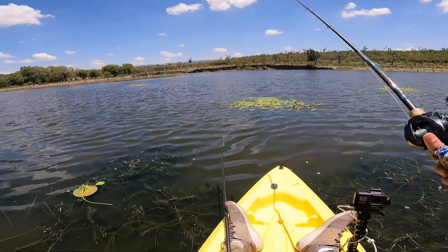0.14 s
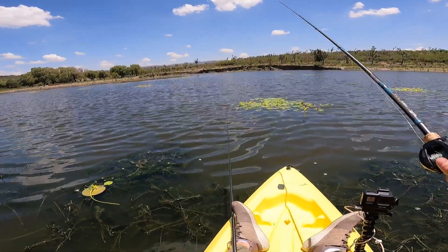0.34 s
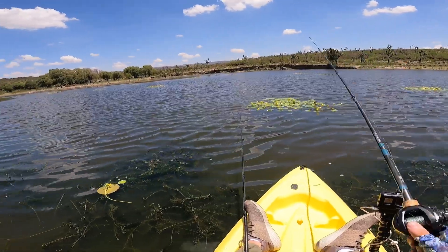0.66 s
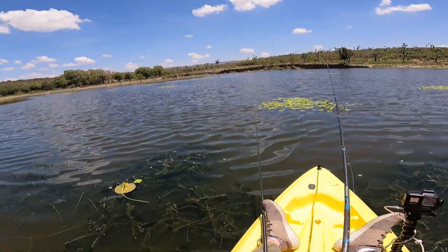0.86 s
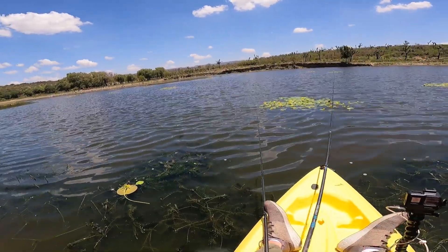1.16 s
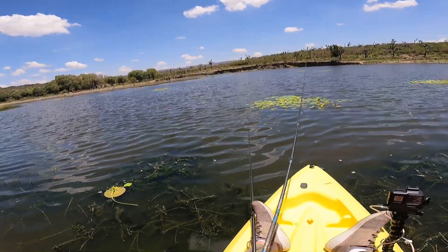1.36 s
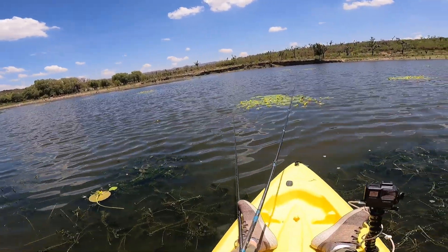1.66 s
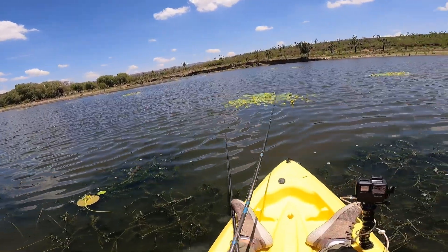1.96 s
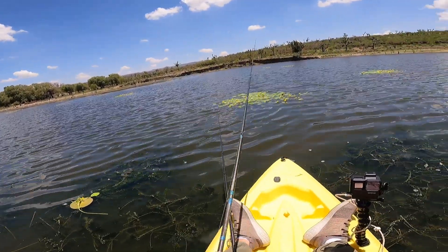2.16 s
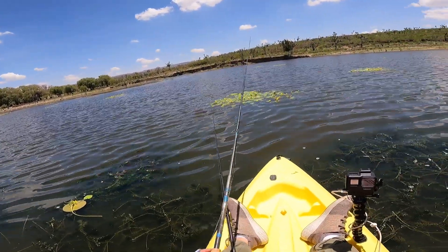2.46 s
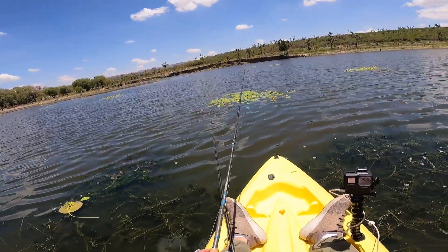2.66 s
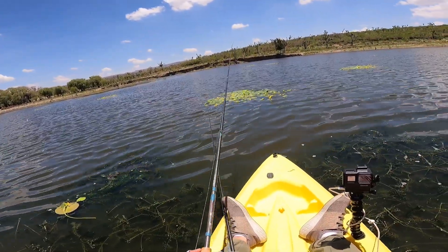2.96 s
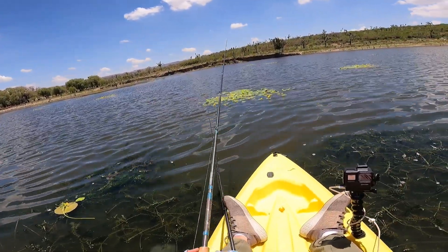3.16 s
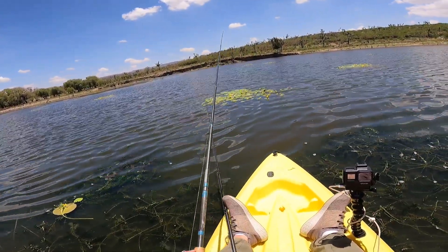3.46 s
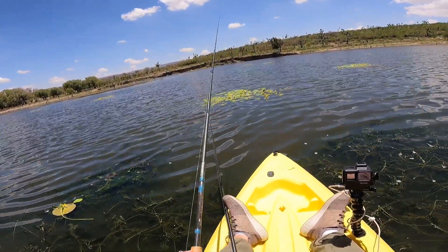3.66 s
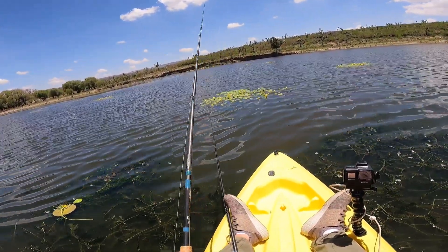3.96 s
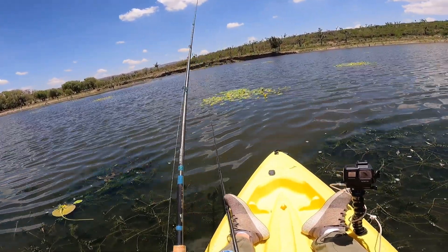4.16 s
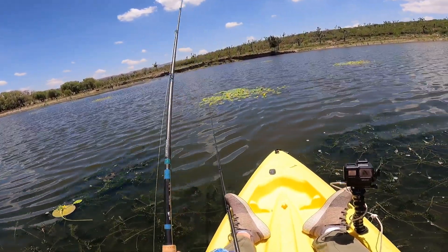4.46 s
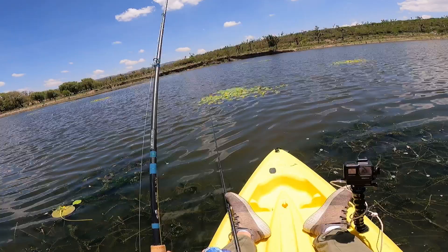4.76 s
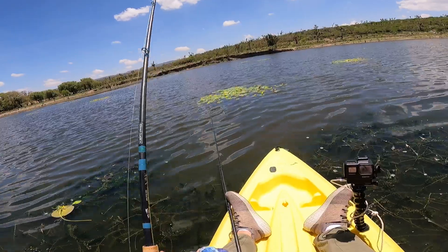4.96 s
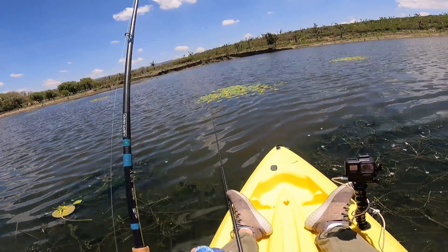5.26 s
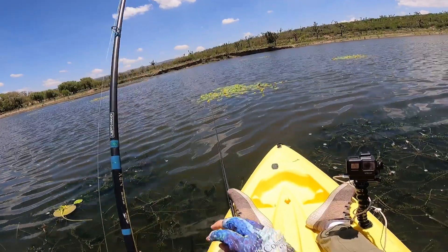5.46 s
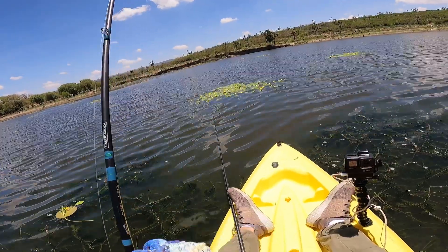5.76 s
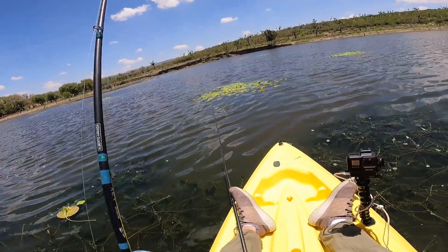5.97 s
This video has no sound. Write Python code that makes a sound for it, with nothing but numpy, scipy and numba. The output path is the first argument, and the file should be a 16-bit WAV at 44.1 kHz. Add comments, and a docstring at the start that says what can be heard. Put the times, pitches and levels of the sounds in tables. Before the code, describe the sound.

Quiet lake, outdoors and dry. Line whirrs softly, a lure plips and bloops into water, and cloth rubs nearby. Two bright, hard reel clacks burst out about 1.2 seconds apart, far louder than everything else, the first distorting and briefly pushing the background down. Low wind buffeting and ripples continue while small birds chirp from the bank.

```python
"""A cast from a kayak

On a quiet lake a spool whirrs (shaped noise) and a lure plops in (water slaps, ringing bubbles and cavity).
The reel clicks twice (struck modes and cracks), overloading and ducking a body-worn microphone.
Light wind rumbles, ripples lap the hull and sleeves rustle (noise with moving levels).
Small birds call from the shore (gliding sines, blurred by an echo)."""
import sys
import numpy as np
from scipy import signal
from scipy.fft import rfft, irfft
from scipy.io import wavfile
from scipy.ndimage import uniform_filter1d
from numba import njit

SR = 44100
rng = np.random.default_rng(int(sys.argv[2]) if len(sys.argv) > 2 else 0)


def master(y):
    """Save y as 16-bit WAV."""
    cut = np.clip(np.atleast_2d(y).T, -1, 1)
    pcm = np.round(cut * 32767)  # scale
    wavfile.write(sys.argv[1], SR, pcm.astype(np.int16))


N = 269671
T = np.arange(N) / SR
RING = T[:SR // 3]  # time since a blow, in seconds

# Contacts inside the reel. Each row: start in seconds, steel level in dB, frame level in dB,
# housing thump level in dB, pitch the steel rings most at in Hz.
REEL_CONTACTS = [(1.4495, -39, -49.5, -60, 6700), (1.4543, -38, -51, -59, 6050),
                 (1.4603, -19.5, -28, -31.5, 7400), (1.4669, -36, -32.5, -50, 6500),
                 (1.4808, -9.5, -25, -28, 6500), (1.483, 6, -.5, -3.5, 6770), (1.4838, 2.5, -15, -19, 7700),
                 (1.4985, -33, -42, -48.5, 6960), (1.5165, -37.5, -41, -48, 6020),
                 (2.666, -37.5, -43, -49, 6500), (2.6905, -33, -42, -45, 6000),
                 (2.7106, -8, -18, -6.5, 5700), (2.7135, -4, -21, -33, 7990), (2.7328, -45, -52, -31, 7000),
                 (2.8106, -49, -49, -42, 6000), (3.283, -50, -43.5, -45, 5000)]
# Modes of the frame, the steel catch and the hollow housing.
# Each row: frequency in Hz, relative level in dB, time to decay by 60 dB in seconds.
FRAME_MODES = [(459, -19.5, 0.031), (1812, -5, .011), (2053, -2, .014), (2215, -21, 0.05),
               (2415, -22.5, .05), (2590, -20.5, 0.086), (2725, -17, .04), (2865, -16, .05),
               (3080, -15.5, .018), (3900, -16, .016)]
STEEL_MODES = [(4400, -14, 0.021), (5320, -5.5, 0.011), (5800, -7.5, .01), (6620, -5, 0.0089),
               (7400, -4.5, 0.0086), (7750, -6, .009), (8040, -3, .01), (8640, -8, 0.0064),
               (9340, -8.5, .01), (10880, -13.5, .008), (12580, -4, .007), (13500, -10, .007),
               (6180, -35, .05), (7080, -29, 0.023)]
HOUSING_MODES = [(780, -2.5, .02), (700, -30.5, 0.1), (840, -25.5, .055), (950, -8, 0.024),
                 (1090, -8.5, .014)]
# Noise of the crack, and of the sound thrown back by the hull.
# Each row: frequency in Hz, relative density in dB per Hz.
CRACK_SPECTRUM = [(100, -15.5), (400, -16.5), (1500, -5.5), (3000, -5.5), (4500, -3.5), (7000, -6),
                  (9000, -4.5), (11000, -8), (15000, -7.5)]
SCATTER_SPECTRUM = [(120, -9.5), (350, -9), (600, 0), (850, 10.5), (1400, -8), (2100, -1.5), (2750, 7),
                    (3300, -7), (7000, -6.5), (9500, -12.5), (12000, -22)]
SOFT_EDGE_HZ, HARD_EDGE_HZ = 8600, 4200  # top edge of a light contact; its rise per unit of blow energy


def reel():
    """Modal impact: contacts milliseconds apart ring steel, frame and housing, and the hull scatters the sound."""
    out = np.zeros(N)
    for at, steel_db, frame_db, thump_db, steel_hz in REEL_CONTACTS:
        blow = undb(steel_db)
        steel = ring(favour(STEEL_MODES, steel_hz), rise_s=.0002)
        crack = undb(-13) * fade(.017) * noise(CRACK_SPECTRUM, len(RING))
        scatter = undb(-29) * fade(.07) * noise(SCATTER_SPECTRUM, len(RING))
        # softer contacts are duller
        snap = band(steel + crack + scatter, 90, SOFT_EDGE_HZ + HARD_EDGE_HZ * blow ** 2)
        frame = ring(FRAME_MODES, rise_s=.0002)
        # the housing thump is kept out of the bass
        thump = band(ring(HOUSING_MODES, rise_s=.00026), 590, 6000)
        add(out, at, blow * snap + undb(frame_db) * frame + undb(thump_db) * thump)
    return out


def favour(modes, centre_hz, focus_octaves=.22, off_centre=.3):
    """Modal excitation: the place of contact favours the modes near one pitch."""
    favoured = []
    for hz, db, t60 in modes:
        distance = np.log2(hz / centre_hz) / focus_octaves
        gain = off_centre + np.exp(-distance ** 2)
        favoured.append((hz, db + 20 * np.log10(gain), t60))
    return favoured


def ring(modes, rise_s):
    """Modal superposition: decaying sines, alternating in sign, build up over the contact time."""
    total = np.zeros(len(RING))
    for k, (hz, db, t60) in enumerate(modes):
        total += (-1) ** k * undb(db) * fade(t60) * np.sin(2 * np.pi * hz * RING)
    return total * (1 - np.exp(-RING / rise_s))


# Slaps of water, from the lure and against the hull.
# Each row: start in seconds, level in dB, pitch in Hz, time to decay by 60 dB in seconds.
WATER_SLAPS = [(0.175, -38, 1500, 0.029), (.195, -52, 770, 0.18), (0.579, -48, 373, 0.089),
               (0.634, -39, 2360, 0.035), (.668, -47.5, 2200, 0.11), (0.6877, -35.5, 1510, 0.045),
               (0.7024, -31, 4200, 0.018), (0.7197, -31.5, 2570, 0.014), (0.7755, -50, 6540, 0.012),
               (.849, -41.5, 1580, 0.029), (1.159, -46, 4000, 0.013), (1.812, -51, 330, 0.13),
               (2.069, -45, 199, .14), (2.585, -50.5, 403, 0.091)]
# Single bubbles. Each row: start in seconds, level in dB, starting pitch in Hz,
# time to decay by 60 dB in seconds, rise in octaves per second.
SINGLE_BUBBLES = [(.205, -44.5, 377, .08, 8.5), (.578, -47, 330, 0.1, 16), (.689, -41, 457, 0.12, -4),
                  (0.689, -32.5, 1244, 0.036, 8), (0.722, -33.5, 327, 0.16, 4),
                  (1.195, -45, 151.1, 0.22, 13.5), (1.814, -49.5, 430, .12, -5),
                  (2.069, -40, 330, .13, -11.5), (2.93, -42, 197.7, .13, -1.5)]


def water():
    """Impact and bubble resonance: the lure slaps, sprays and closes a cavity; wavelets slap the hull."""
    out = spray()
    for at, *shape in WATER_SLAPS:
        add(out, at, splash(*shape))
    for at, *shape in SINGLE_BUBBLES:
        add(out, at, bubble(*shape))
    add(out, .749, bloop())
    return out


def spray(start_s=.618, length_s=.112, count=16, db=-47.5, centre_hz=5800, spread_octaves=1.2):
    """Random superposition: fine drops thrown up as the lure skims in land one per time slot."""
    out = np.zeros(N)
    for k, (late, pitch) in enumerate(rng.random((count, 2))):
        hz = centre_hz * 2 ** (spread_octaves * (pitch - .5))
        add(out, start_s + length_s * (k + late) / count, splash(db, hz, t60=.033))
    return out


def splash(db, hz, t60, droplets_db=3):
    """Impact noise: a slap of water, peaked at one pitch, is broken up by separate droplets."""
    colour = [(hz / 4, -11), (hz / 1.9, -5), (hz, 0), (hz * 1.18, -8), (hz * 3, -17)]
    drops = noise(colour, len(RING)) * undb(droplets_db * walk(600, len(RING)))
    drops = band(drops, 97, min(hz * 4, 10000))
    return undb(db) * drops * fade(t60) * (1 - np.exp(-RING / .00081))


def bubble(db, hz, t60, rise):
    """Bubble resonance: a ringing air pocket whose pitch slides as it moves."""
    sine = np.sin(2 * np.pi * np.cumsum(hz * 2 ** (rise * RING)) / SR)
    return undb(db) * fade(t60) * (1 - np.exp(-RING / .00074)) * sine


def bloop(db=-31.5, start_hz=424, octaves_per_s=31, hold_s=.04, t60=.037):
    """Cavity resonance: the air behind the lure rings ever higher as it shrinks, then dies away."""
    t = RING[RING < hold_s + t60]
    decay = np.exp(-np.log(1000) * np.maximum(t - hold_s, 0) / t60)
    envelope = (1 - np.exp(-t / .0013)) * decay
    return undb(db) * envelope * tone(start_hz * 2 ** (octaves_per_s * t), waver=.014)


# Whirr of the spool. Each row: time in seconds, relative level in dB.
SPOOL_LEVEL = [(0, -60.5), (.2, -64.5), (.35, -63), (.5, -69), (.62, -72), (.9, -69)]
# Each row: frequency in Hz, relative density in dB per Hz.
SPOOL_SPECTRUM = [(300, 4), (700, 9), (1200, -2), (1450, 7.5), (1560, 6), (1700, 6), (2000, -2),
                  (2600, -31), (5000, -11), (9000, -31)]


def spool():
    """Spectral shaping: line whirrs off the spool as unsteady noise with raised bands."""
    return undb(-1 + 1.7 * walk(44)) * swell(SPOOL_LEVEL) * noise(SPOOL_SPECTRUM)


# Sleeve rubs: a long soft rustle, with shorter rubs over and after it.
# Each row: start in seconds, length in seconds, relative level in dB.
SLEEVE_RUBS = [(0, 1.61, -67.5), (0, 0.079, -66), (0.304, 0.083, -80.5), (0.433, 0.093, -78.5),
               (1.168, 0.14, -63), (1.36, 0.14, -63.5), (1.66, 0.11, -69.5), (1.801, 0.013, -69),
               (1.93, .13, -76.5), (2.53, 0.061, -65), (2.658, 0.059, -61), (2.77, 0.055, -67),
               (2.88, 0.48, -72), (3.38, .2, -73.5), (5.48, 0.5, -65.5)]
# Each row: frequency in Hz, relative density in dB per Hz.
CLOTH_SPECTRUM = [(500, 5.5), (1500, 2), (3000, 2), (4500, -2.5), (6500, 3), (8200, -1.5), (10000, -9.5),
                  (14000, -28.5)]


def sleeves(grain_db=2, pressure_db=.82):
    """Friction noise: sleeves rub in small catches under a changing pressure as the rod is moved."""
    rubs = np.zeros(N)
    for at, length_s, db in SLEEVE_RUBS:
        add(rubs, at, undb(db) * arch(length_s, roundness=.6)[1])
    catches = undb(4 + grain_db * walk(150) + pressure_db * walk(25))
    return catches * rubs * noise(CLOTH_SPECTRUM)


def birds(flutter_db=2.0, echo_db=-6, echo_t60=.35):
    """Amplitude modulation and diffuse reflection: fluttering calls from the bank, blurred by the bushes."""
    calls = hooked_calls() + whistles() + chirps() + twitter()
    calls *= undb(flutter_db * walk(90))
    bushes = rng.standard_normal(len(RING)) * fade(echo_t60)
    echo = signal.fftconvolve(calls, bushes / np.linalg.norm(bushes))[:N]
    return calls + undb(echo_db) * echo


# Hooked calls. Each row: start in seconds, length in seconds, peak pitch in Hz,
# held pitch in Hz, relative level in dB.
HOOKED_CALLS = [(3.508, .21, 5500, 4130, -67), (4.875, .16, 5250, 4380, -63),
                (5.883, .165, 5280, 4004, -55)]


def hooked_calls():
    """Frequency modulation: each call flicks up to a high peak and drops to a sagging note."""
    out = np.zeros(N)
    for at, *shape in HOOKED_CALLS:
        add(out, at, hook(*shape))
    return out


def hook(length_s, peak_hz, held_hz, db, sag=.72, fade_db=3.5, accent_db=7):
    """Frequency modulation: a bell-shaped flick rides on a bent note, with stress on the peak."""
    u, envelope = arch(length_s, roundness=.6)
    held = held_hz * (1 - sag * (u - .6) ** 2)
    flick = np.exp(-((u - .15) / .115) ** 2)  # place and width as shares of the call's length
    level = undb(db + fade_db * (.5 - u) + accent_db * flick)
    return level * envelope * tone(held + (peak_hz - held) * flick, waver=.0095)


# Plain slurred whistles. Each row: start in seconds, length in seconds, first pitch in Hz,
# last pitch in Hz, relative level in dB.
SLURRED_WHISTLES = [(2.81, .12, 4450, 3700, -69.5), (3.06, .09, 5250, 5750, -69),
                    (3.185, .06, 6000, 6480, -69), (3.913, .07, 3500, 3900, -67.5),
                    (4.03, .05, 3450, 3850, -73), (4.43, .022, 5600, 6800, -63.5),
                    (4.735, .1, 5050, 4350, -72)]


def whistles():
    """Linear glide: plain whistles slur up or down."""
    out = np.zeros(N)
    for at, *shape in SLURRED_WHISTLES:
        add(out, at, slur(*shape))
    return out


# Upward chirps. Each row: start in seconds, relative level of the lower voice in dB.
UPWARD_CHIRPS = [(3.24, -60.5), (4.795, -67), (5.294, -57)]


def chirps(length_s=.033, from_hz=2400, to_hz=4250, upper_ratio=1.38, upper_db=-12):
    """Two-voice superposition: quick upward glides sound together at a fixed pitch ratio."""
    out = np.zeros(N)
    for at, db in UPWARD_CHIRPS:
        add(out, at, slur(length_s, from_hz, to_hz, db))
        add(out, at, slur(length_s, upper_ratio * from_hz, upper_ratio * to_hz, db + upper_db))
    return out


def twitter(start_s=4.667, interval_s=.027, count=7, centre_hz=6500, fall=.1):
    """Pulse train: a run of quick falling chips, overlapping slightly."""
    out = np.zeros(N)
    for k in range(count):
        hz = centre_hz * (1 + .04 * rng.standard_normal())
        chip = slur(.032, hz * (1 + fall), hz * (1 - fall), db=-68, waver=.06)
        add(out, start_s + k * interval_s, chip)
    return out


def slur(length_s, from_hz, to_hz, db, waver=.0087):
    """Linear glide: a bird's note slides from one pitch to another."""
    u, envelope = arch(length_s, roundness=.6)
    return undb(db) * envelope * tone(from_hz + (to_hz - from_hz) * u, waver)


# Strength of the ripples. Each row: time in seconds, level of the wash in dB.
RIPPLE_LEVEL = [(0, -60.5), (.95, -55), (1.1, -48.5), (1.5, -53), (2.1, -55), (2.9, -53), (3.76, -54.5),
                (4.0, -56), (4.9, -59), (5.55, -55.5), (6.11, -59)]
# Each row: frequency in Hz, relative density in dB per Hz.
RIPPLE_SPECTRUM = [(40, -2.5), (80, 2.5), (150, 0), (240, -8), (400, -19.5), (900, -36)]


def hull(gulp_db=1, gulp_hz=190):
    """Flow noise and bubble resonance: ripples wash along the kayak and trap small, low air pockets."""
    gulps = np.zeros(N)
    for at, pitch, size, rise in rng.random((60, 4)):
        hz = gulp_hz * 2 ** (1.6 * (pitch - .5))
        gulp = bubble(gulp_db + 9 * size, hz, t60=.053, rise=8 * (rise - .5))
        add(gulps, at * T[-1], gulp)
    return swell(RIPPLE_LEVEL) * (noise(RIPPLE_SPECTRUM) + gulps)


# Strength of the wind at the microphone. Each row: time in seconds, relative level in dB.
WIND_LEVEL = [(0.0, -44), (0.63, -38), (0.75, -45), (1.33, -34.5), (1.36, -45.5), (2.64, -37.5),
              (2.77, -28), (2.98, -44), (3.01, -37.5), (3.62, -41.5), (3.9, -39.5), (5.12, -45),
              (5.21, -35.5), (5.29, -45.5), (5.34, -28.5), (5.43, -38), (5.99, -34.5), (6.11, -47)]
# Wind rumble and the rush of the open lake. Each row: frequency in Hz, relative density in dB per Hz.
WIND_SPECTRUM = [(8, -1.5), (18, 0), (30, -5), (50, -14.5), (80, -22), (150, -36.5), (400, -58)]
AIR_SPECTRUM = [(150, -30), (250, -1.5), (339, -6.5), (370, -3.5), (402, -2.5), (575, -4), (794, -0.5),
                (1280, -14), (3200, -18), (4060, -19), (4410, -18), (4890, -19.5), (5230, -19),
                (7730, -21.5), (14500, -26)]


def breeze():
    """Turbulent pressure: eddies buffet the microphone over the soft, even rush of the open lake."""
    eddies = noise(WIND_SPECTRUM)
    eddies /= np.sqrt(uniform_filter1d(eddies ** 2, size=6000))  # the gusts alone set their strength
    rumble = undb(4.5) * swell(WIND_LEVEL) * eddies
    air = undb(-61.5 + .35 * walk(6.8)) * noise(AIR_SPECTRUM)
    return rumble + air


def undb(db):
    """Logarithmic level: decibels to gain."""
    return 10 ** (np.asarray(db) / 20)


def fade(t60):
    """Exponential damping: free decay by 60 dB in t60 seconds."""
    return np.exp(-np.log(1000) * RING / t60)


def add(out, at, sound):
    """Superposition: mix a sound in at a time in seconds."""
    i = int(round(at * SR))
    out[i:i + len(sound)] += sound[:N - i]


def swell(rows):
    """Level envelope: smoothed gain from (seconds, dB) rows, silent outside them."""
    s, db = np.transpose(rows)
    inside = (T >= s[0]) * (T <= s[-1])
    return uniform_filter1d(undb(np.interp(T, s, db)) * inside, size=200)


def noise(colour, length=N):
    """Spectral shaping: noise of rms 1 with a (Hz, dB) spectrum that falls away beyond its ends."""
    hz, db = np.transpose(colour)
    f = np.fft.rfftfreq(length, 1 / SR) + 1e-3
    gain = undb(np.interp(np.log(f), np.log(hz), db))
    gain *= np.minimum(f / hz[0], 1) ** 2 * np.minimum(hz[-1] / f, 1) ** 2
    x = irfft(rfft(rng.standard_normal(length)) * gain, length)
    return x / x.std()


def walk(rate, length=N):
    """Random modulation: slow chance with a spread of 1, drawn rate times a second."""
    k = int(SR / rate)
    steps = np.repeat(rng.standard_normal(length // k + 1), k)
    x = uniform_filter1d(steps, k)[:length]
    return x / x.std()


def band(x, low_hz, top_hz):
    """Band-pass filtering: keep what lies between two edges."""
    edges = [low_hz, min(top_hz, .45 * SR)]
    return signal.sosfilt(signal.butter(3, edges, "band", fs=SR, output="sos"), x)


def arch(length_s, roundness):
    """Amplitude envelope: progress from 0 to 1, and a swell and decay, more gradual if roundness is large."""
    u = np.linspace(0, 1, int(length_s * SR))
    return u, np.abs(np.sin(np.pi * u)) ** roundness


def tone(hz, waver):
    """Phase integration: a sine on a moving, slightly unsteady pitch."""
    unsteady = 1 + waver * walk(400, len(RING))[:len(hz)]
    return np.sin(2 * np.pi * np.cumsum(hz * unsteady) / SR)


@njit
def follow(size, attack, release):
    """Envelope detection: the level rises quickly and lets go slowly."""
    out, e = np.empty(len(size)), 0.
    for i in range(len(size)):
        e += (size[i] - e) * (attack if size[i] > e else release)
        out[i] = e
    return out


def scene():
    """Superposition: every source as it reaches the one microphone."""
    return (reel() + water() + spool() + sleeves() + birds() + hull() + breeze())[None]


def record(dry, knee_db=-4.5, attack_s=.0012, release_s=.8, top_hz=15600):
    """Gain control and clipping: it ducks after a loud click, too slowly to prevent overload; the top is cut."""
    level = follow(np.abs(dry[0]), 1 / (attack_s * SR), 1 / (release_s * SR))
    ducked = dry / np.maximum(level / undb(knee_db), 1)
    clipped = np.clip(ducked, -1, 1)
    return signal.sosfilt(signal.ellip(8, .2, 70, top_hz, fs=SR, output="sos"), clipped)


dry = scene()
out = record(dry)
master(out)
```